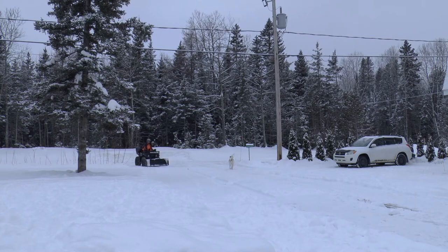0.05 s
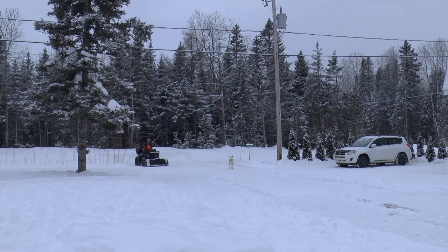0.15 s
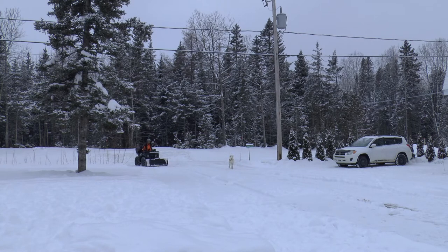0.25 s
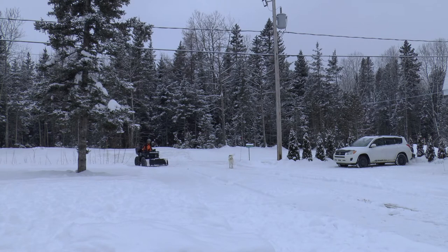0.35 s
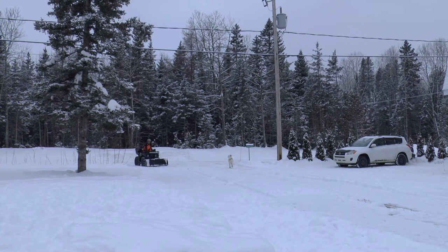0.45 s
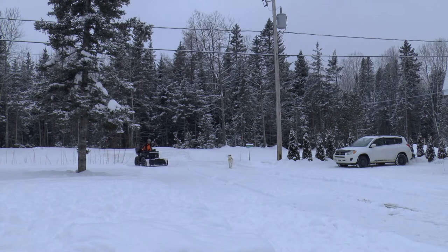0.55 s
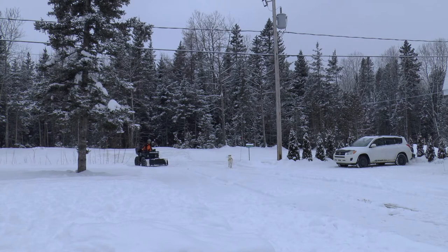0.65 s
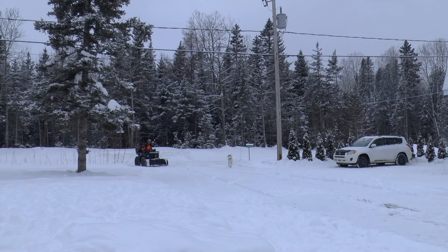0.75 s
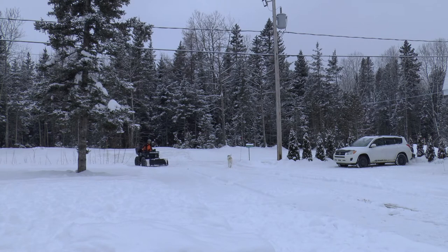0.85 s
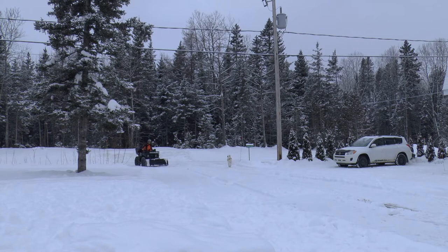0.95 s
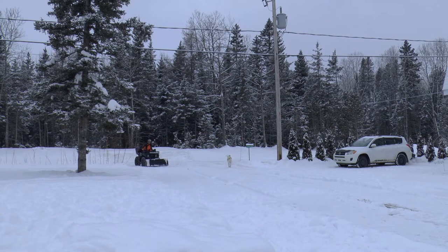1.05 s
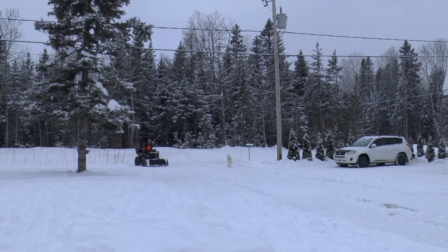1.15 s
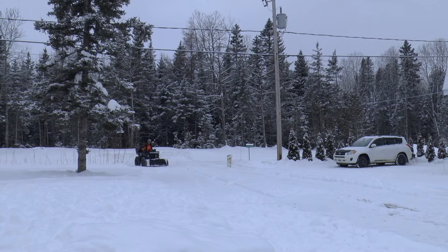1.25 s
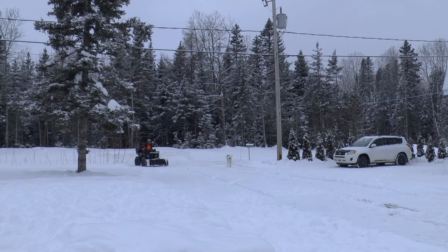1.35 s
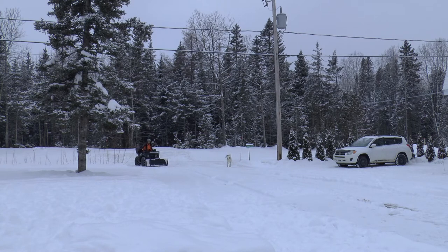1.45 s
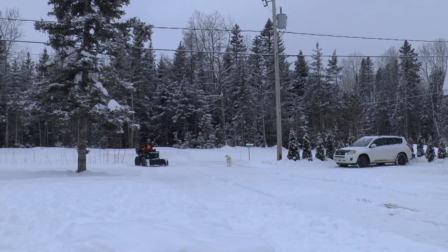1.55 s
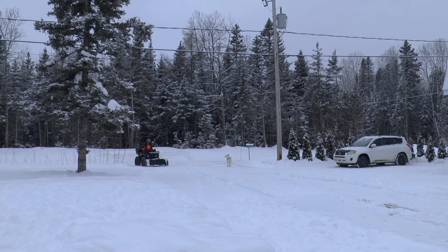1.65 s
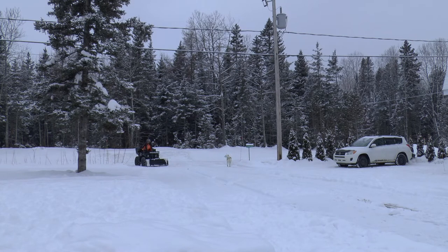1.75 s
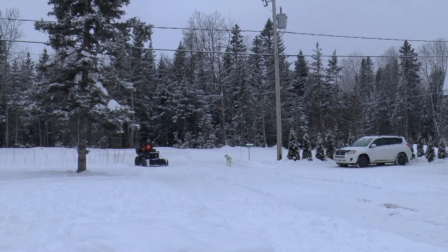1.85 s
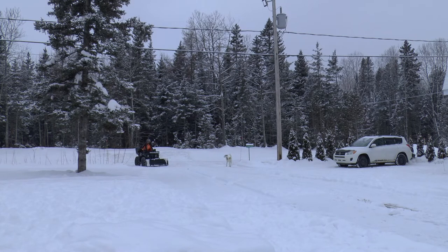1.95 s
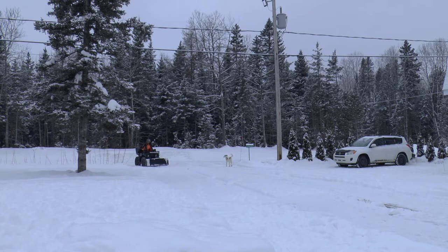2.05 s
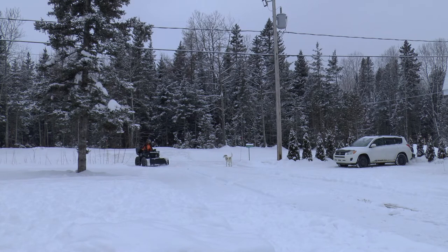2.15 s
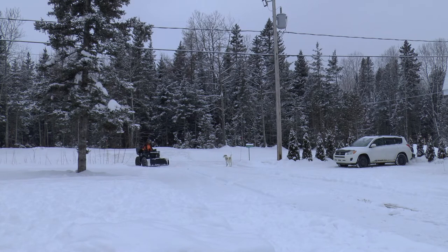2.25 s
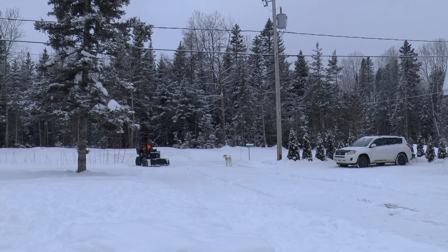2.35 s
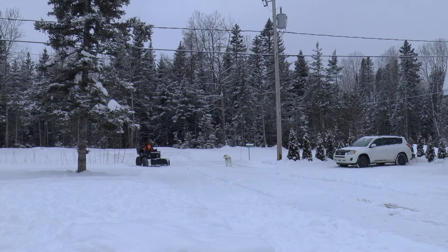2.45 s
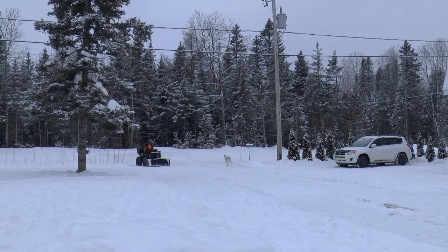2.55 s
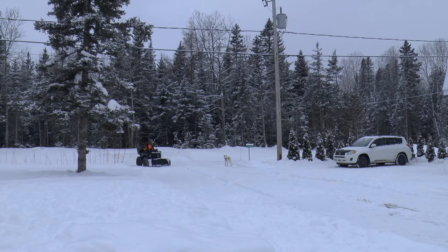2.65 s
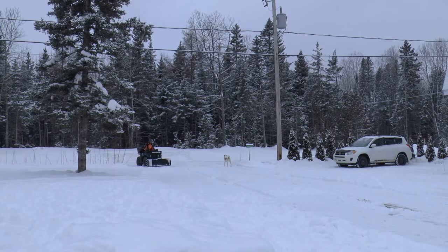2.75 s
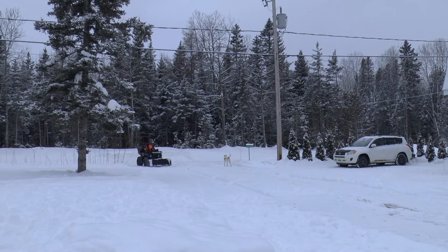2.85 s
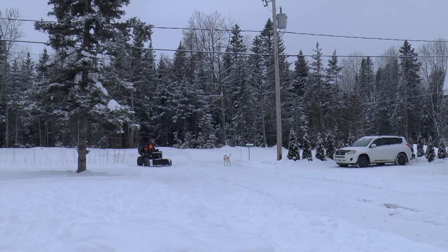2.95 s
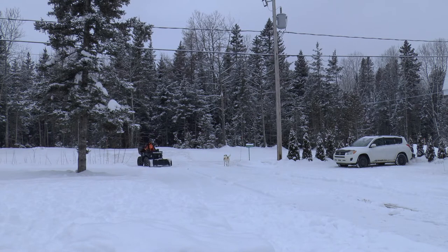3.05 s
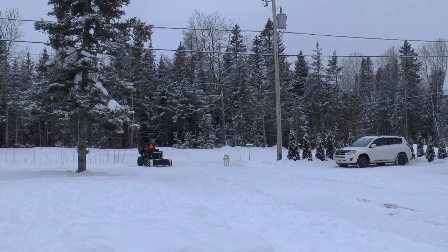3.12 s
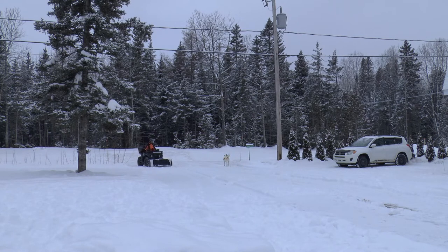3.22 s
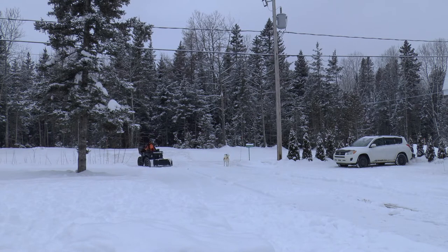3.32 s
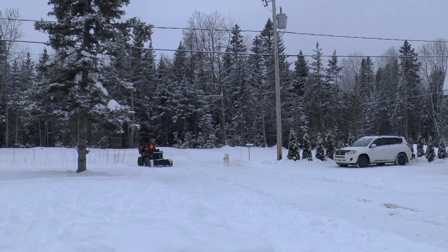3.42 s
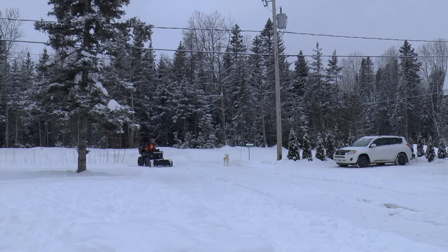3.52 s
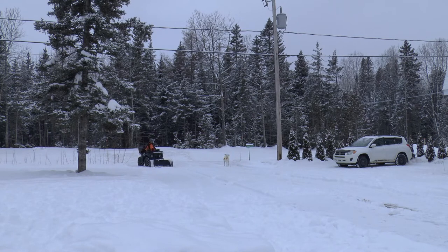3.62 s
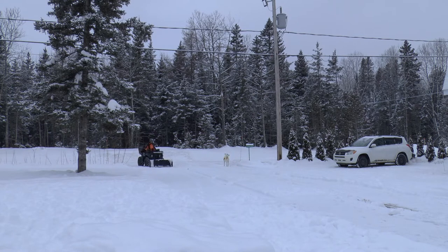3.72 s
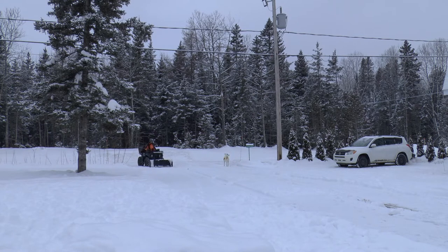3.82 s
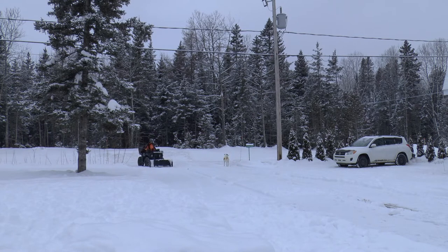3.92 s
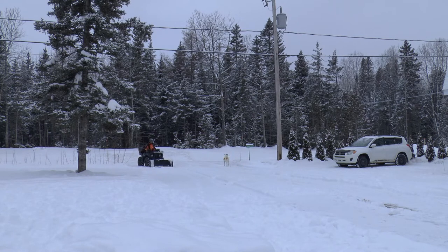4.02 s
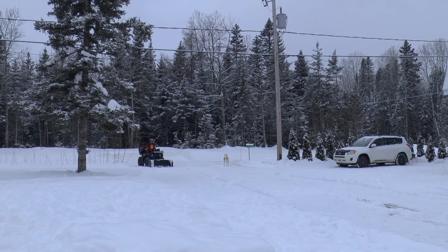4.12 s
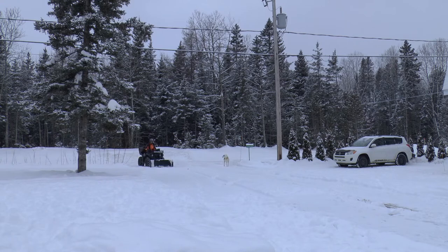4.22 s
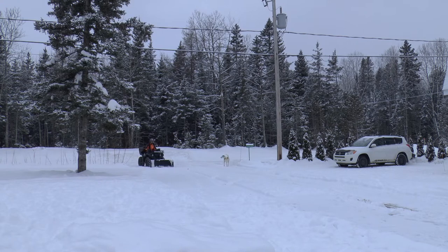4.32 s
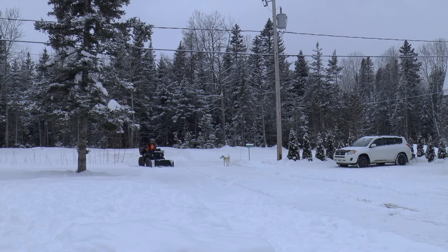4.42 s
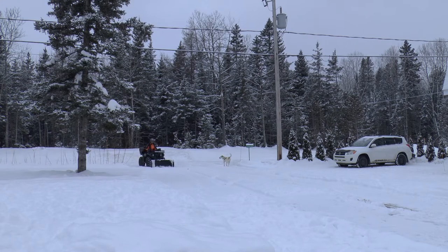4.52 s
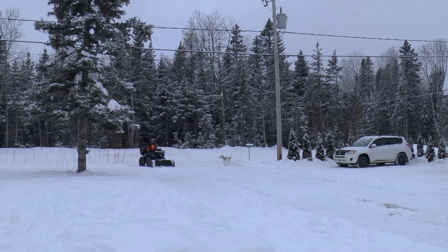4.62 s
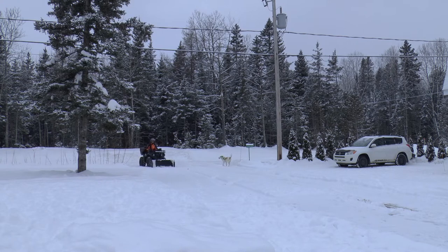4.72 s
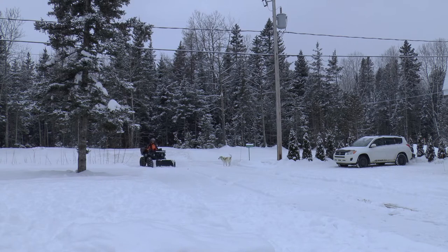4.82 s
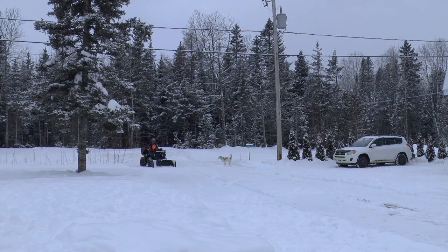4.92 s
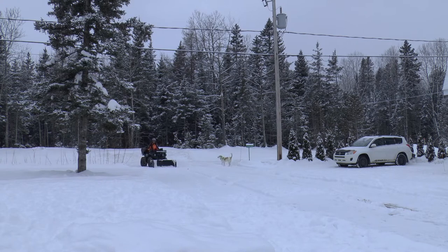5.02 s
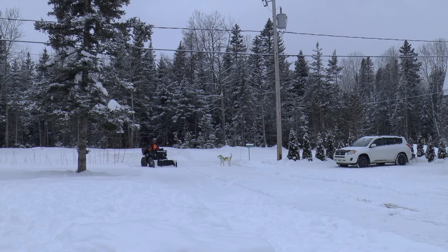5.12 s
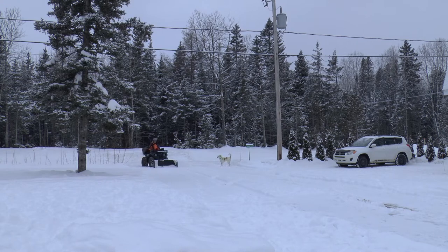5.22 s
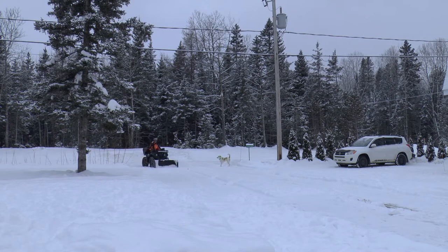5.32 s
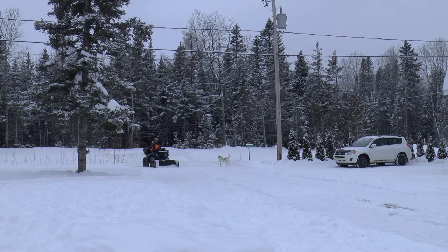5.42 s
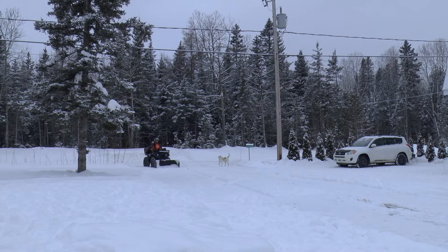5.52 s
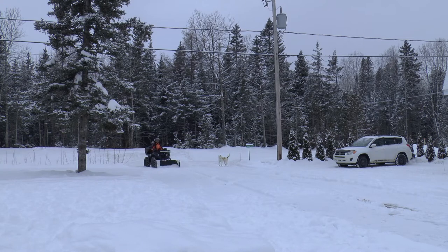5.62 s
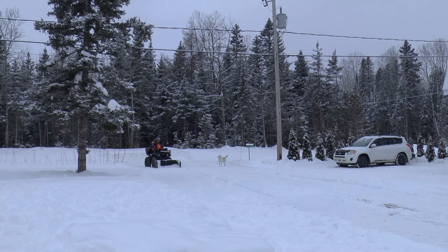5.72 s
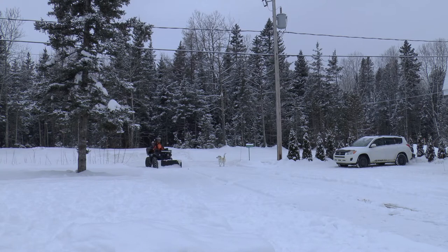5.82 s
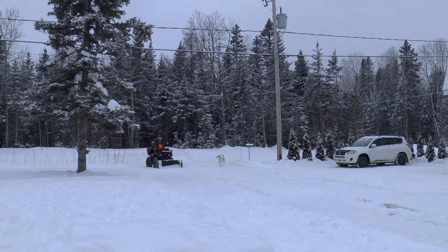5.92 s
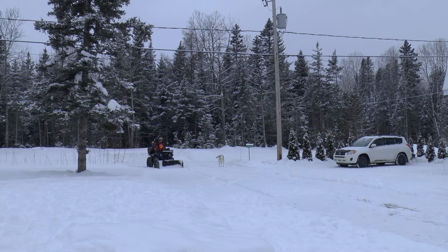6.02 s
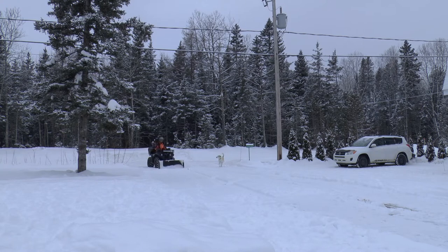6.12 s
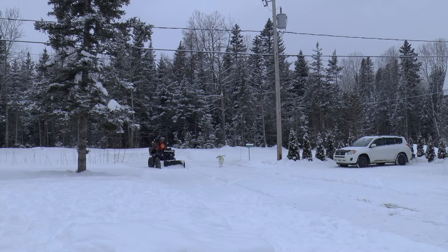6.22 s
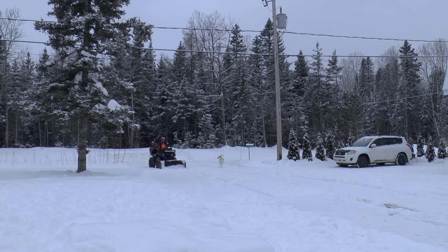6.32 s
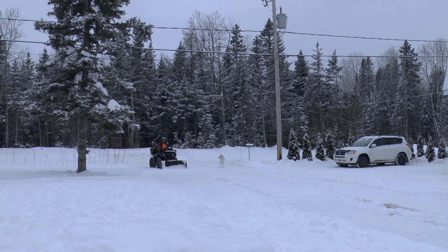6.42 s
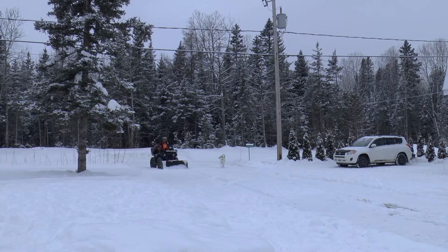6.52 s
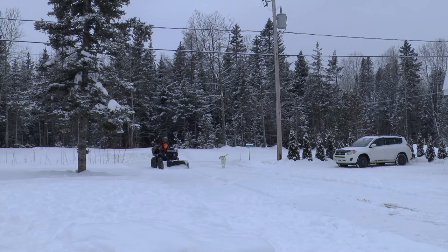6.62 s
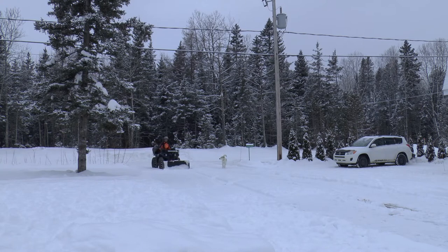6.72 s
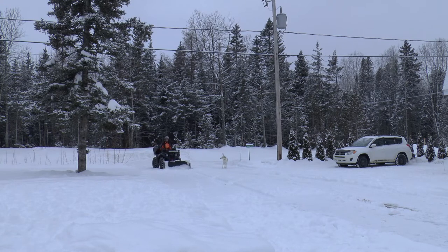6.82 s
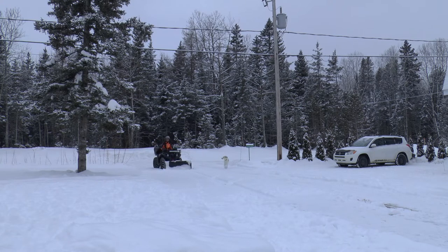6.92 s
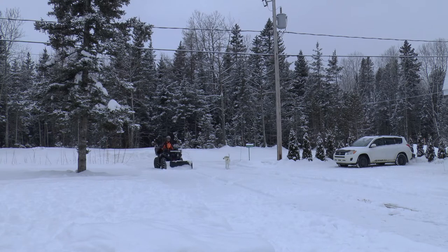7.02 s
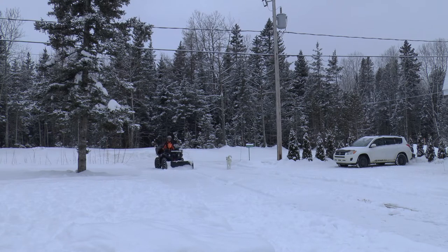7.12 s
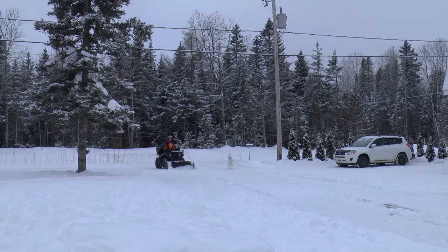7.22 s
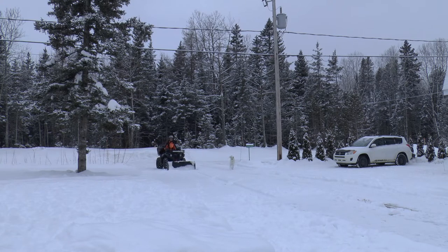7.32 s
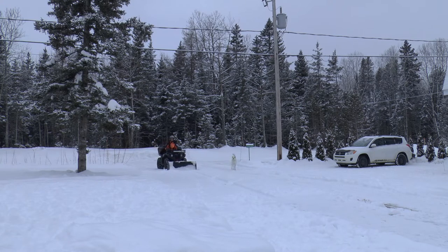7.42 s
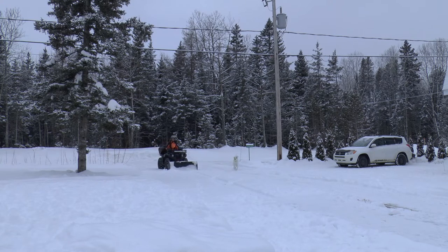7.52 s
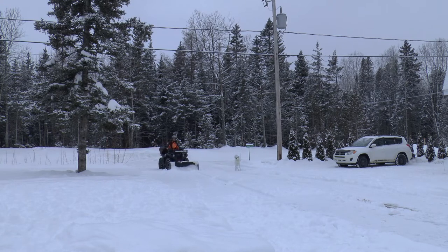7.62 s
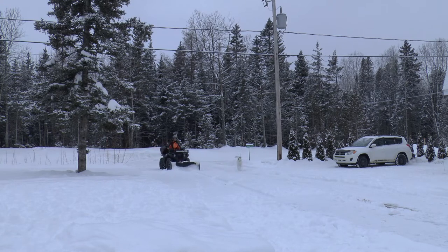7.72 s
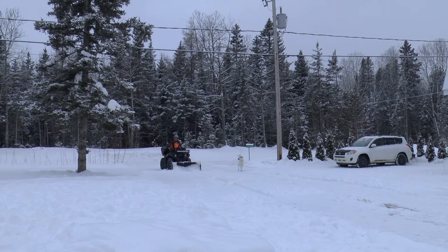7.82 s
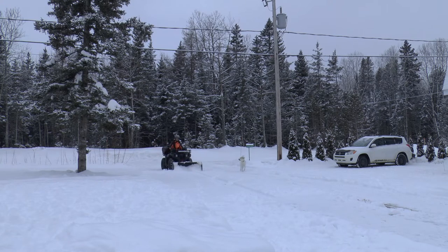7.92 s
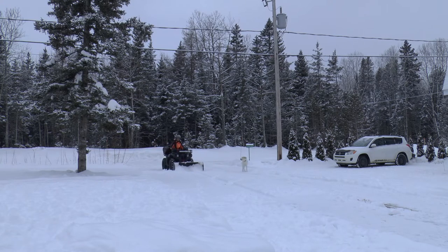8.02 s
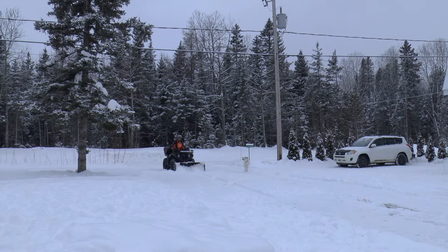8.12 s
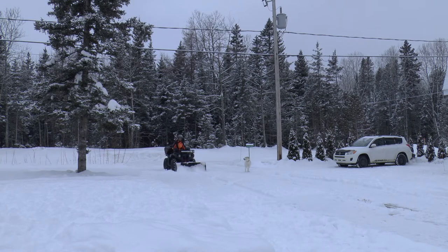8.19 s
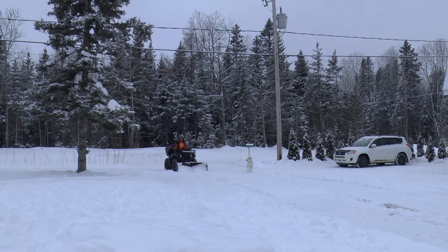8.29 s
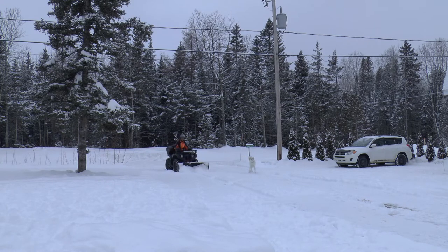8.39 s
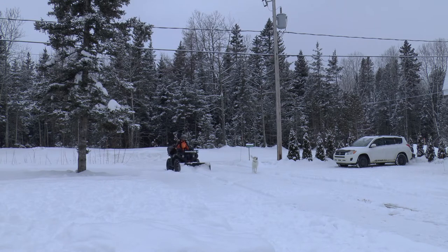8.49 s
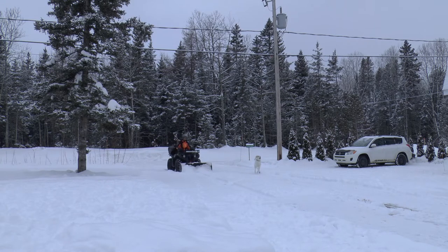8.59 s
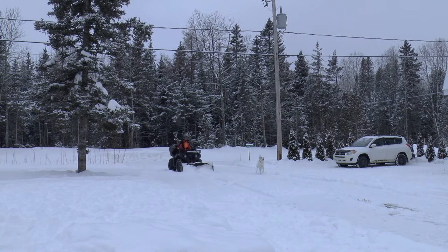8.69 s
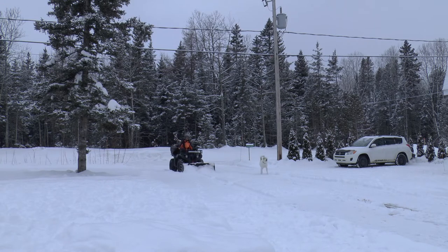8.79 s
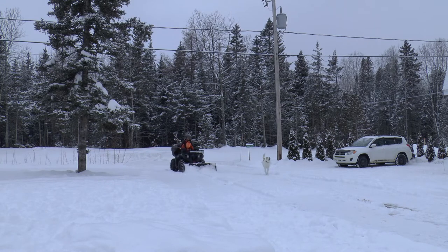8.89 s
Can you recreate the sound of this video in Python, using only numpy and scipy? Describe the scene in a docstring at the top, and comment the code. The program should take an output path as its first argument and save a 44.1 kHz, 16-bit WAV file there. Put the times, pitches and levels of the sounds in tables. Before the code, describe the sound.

An all-terrain vehicle idles with metal clacks, raises its plow with a whining winch, then revs up and slowly comes closer.

```python
"""A single-cylinder all-terrain vehicle with a snow plow works some way off in a snowy yard edged by trees.
Each firing excites the cavity resonances of airbox and exhaust, a boom, while valve impacts ring the
casing. It idles and shunts as gear lever and plow mount clack; a winch clicks in and raises the blade
with a whine of meshing gears. Under load the engine picks up and comes closer, growing louder.
Two walls reflect the sound and the trees scatter it, over a faint steady hiss."""
import sys
import numpy as np
from scipy import signal
from scipy.fft import rfft, irfft
from scipy.io import wavfile
from scipy.ndimage import uniform_filter1d

SR = 44100
rng = np.random.default_rng(int(sys.argv[2]) if len(sys.argv) > 2 else 0)


def waveform_to_disk(signal):
    """Save audio, clipped to [-1, 1], as 16-bit WAV at the path in sys.argv[1]."""
    frames = np.transpose(np.atleast_2d(signal))
    scaled = np.clip(frames, -1, 1) * 32767
    samples = np.round(scaled).astype(np.int16)
    wavfile.write(sys.argv[1], SR, samples)


N = 394694
TIME = np.arange(N) / SR

# engine speed: (time [s], firing rate [Hz])
FIRING = [(0.0, 11.8), (1.45, 11.61), (1.73, 17.92), (1.97, 20.69), (2.53, 19.94), (2.73, 19.64),
          (3.04, 13.19), (3.53, 10.41), (3.93, 19.44), (4.2, 21.47), (4.82, 22.57), (5.42, 22.37),
          (6.13, 26.64), (7.26, 29.31), (7.6, 29.97), (8.07, 29.61), (8.95, 28.59)]
# spectrum of a sharp metal snap: (frequency [Hz], level [dB])
SNAP = [(300, -22), (700, -22), (1400, -15.5), (1800, -7), (3200, -3), (6000, -10.5), (9000, -16.5),
        (16000, -42)]

IDLE_HZ, FULL_HZ = 11.8, 30  # firing rates
DRIVE_S = 2.65  # the machine drives off
THROTTLE_DB = 0.0812  # lift of boom and clatter per Hz/s of engine acceleration


def boom(cycles, lead_s=0.02092):
    """Cavity resonance: firing pulses drive airbox, muffler and pipe; hotter gas raises the muffler note."""
    # spectrum of a firing pulse: (frequency [Hz], level [dB])
    pulse_spectrum = [(15, 12), (29, -10.5), (44, -3), (60, -12), (80, 12), (105, 11.5), (132, 3.5),
                      (165, -9.5), (240, -40), (400, -31)]
    # swell as harmonics cross the resonances: (firing rate [Hz], airbox level [dB], muffler level [dB])
    cavity_levels = [(11.6, -48, -50.5), (16.2, -43.5, -47.5), (18.2, -48, -41), (20.65, -55, -44),
                     (22.4, -45, -38.5), (24.7, -40, -39.5), (25.5, -46, -43.5), (27, -42, -40),
                     (30.2, -39, -36.5)]
    speed = curve(FIRING)
    thump = colour(strokes(cycles + lead_s * speed, spread_db=1), pulse_spectrum)
    speeds, *levels = np.transpose(cavity_levels)
    airbox_db, muffler_db = (np.interp(speed, speeds, db) + THROTTLE_DB * throttle() for db in levels)
    muffler_hz = np.interp(speed, [12, 21, 30], [100, 112, 117])
    pipe_db = -54 + 0.15 * (muffler_db - muffler_db.max())
    # (frequency [Hz], bandwidth [Hz], level [dB])
    cavities = [(84, 30, airbox_db), (muffler_hz, 34, muffler_db), (46, 18, pipe_db), (178, 35, -63.5)]
    return sum(amp(db) * steadied(resonate(resonate(thump, hz, width), hz, width))
               for hz, width, db in cavities)


def clatter(cycles, t60=0.083, looseness=0.54, gas_rush=0.93):
    """Impact excitation: valve and piston ticks ring the casing; loose play and gas rush add noise."""
    # valve and piston impacts: (phase [cycles], level [dB])
    impacts = [(0.01, -0.5), (0.17, -3), (0.44, -1), (0.54, -1.5), (0.7, -4.5)]
    # spectra of the gruff midrange and the bright metal: (frequency [Hz], level [dB])
    gruff_spectrum = [(70, -23), (170, 5), (300, 2), (450, -2.5), (750, -6), (900, -6.5), (1250, 0),
                      (1700, -13), (4000, -34.5)]
    metal_spectrum = [(700, -26), (1300, -21), (1800, 2), (2500, 1.5), (3100, -3.5), (4400, -8.5),
                      (5800, -20), (8000, -22.5), (10000, -24), (13000, -33), (16000, -64.5)]
    # casing resonances: (frequency [Hz], bandwidth [Hz], gain [dB])
    casing_modes = [(579, 21, 7), (741, 160, 11.5), (1070, 86, 5.5), (1426, 180, 11), (1760, 63, 3),
                    (2370, 31, 4.5), (2304, 68, -6.5), (2760, 38, -3.5), (3430, 130, -2.5)]
    ticks, play = np.zeros(N), np.zeros(N)
    for phase, db in impacts:
        hits = amp(db) * strokes(cycles - phase, spread_db=2)
        ticks += signal.oaconvolve(hits, ring(t60))[:N]
        play += signal.oaconvolve(hits, amp(-60 * TIME[:SR // 10] / t60))[:N]
    force = evened(ticks) + (looseness * evened(play) + gas_rush) * rng.standard_normal(N)
    octaves = np.log2(curve(FIRING) / IDLE_HZ)
    opening = np.maximum(throttle(), 0)
    gruff = colour(force, gruff_spectrum, casing_modes)
    gruff_db = -66 + 7 * octaves + 3 * load() + 0.06 * opening
    metal = colour(force, metal_spectrum, casing_modes)
    # at low speed the casing's lower modes chug once a cycle; with speed the chugs run together
    chug_db = np.interp(curve(FIRING), [17, 26], [1, 0]) + 0.34 * opening
    chug = amp(chug_db * np.cos(2 * np.pi * (cycles - .65)))
    metal += (chug - 1) * resonate(metal, hz=1750, width=360)
    metal_db = -59 + 8 * octaves + THROTTLE_DB * throttle()
    return amp(gruff_db) * steadied(gruff) + amp(metal_db) * steadied(metal)


def knock(cycles, phase=.905, t60=0.03, full_speed_db=-49.5, fall_db_per_hz=2.5):
    """Impulse response: combustion raps the cylinder once a cycle, nearly the same way each time."""
    # cylinder response: (frequency [Hz], level [dB])
    spectrum = [(900, -51), (2000, -3.5), (2700, 2.0), (3700, -3), (5500, -37), (12000, -62)]
    hits = strokes(cycles - phase, spread_db=0.8)
    play = signal.oaconvolve(hits, amp(-60 * TIME[:SR // 10] / t60))[:N] * rng.standard_normal(N)
    blows = signal.oaconvolve(hits, ring(t60))[:N] + play
    rap = colour(blows, spectrum, modes=[(2287, 36, 9)])
    return amp(full_speed_db - fall_db_per_hz * (FULL_HZ - curve(FIRING))) * steadied(rap)


def overtones(cycles, waver_db=3.0):
    """Harmonics of a periodic source: under load a few high engine orders stand out, growing with speed."""
    # engine orders: (frequency [multiples of the firing rate])
    orders = [16, 20, 26]
    # strength of each order: (level [dB])
    levels = [-73.5, -68.5, -70.5]
    tones = sum(amp(db + waver_db * wander(6)) * np.sin(2 * np.pi * order * cycles)
                for order, db in zip(orders, levels))
    return load() * (curve(FIRING) / FULL_HZ) ** 4 * tones


def throttle():
    """Engine acceleration: the smoothed slope of the firing rate, in Hz/s."""
    return uniform_filter1d(np.gradient(curve(FIRING)) * SR, size=6000)


def load(rise_s=2):
    """Engine load, 0-1: a linear ramp as the machine drives off."""
    return np.clip((TIME - DRIVE_S) / rise_s, 0, 1)


def winch(on_s=3.335, off_s=5.395, rise_s=0.14, fall_s=0.035, squeak_s=5.278, level_db=-44.5):
    """Amplitude modulation: planet gears grind and whine, pulsing as motor and carrier turn."""
    # tooth meshing: (time [s], frequency [Hz])
    mesh = [(3.38, 2890), (3.7, 2920), (4.3, 2883), (4.9, 2898), (5.44, 2813)]
    # spectrum of the grinding: (frequency [Hz], level [dB])
    gear_spectrum = [(400, -35), (1400, -6.5), (2000, 2), (3000, 6.5), (4300, 5.5), (5500, -3.5),
                     (6200, -6.5), (7200, -12), (9500, -16.5), (12500, -29), (16000, -40)]
    # housing resonances: (frequency [Hz], bandwidth [Hz], gain [dB])
    housing_modes = [(2034, 89, 9.7), (2370, 41, 0.69), (3520, 31, 3.6), (3700, 29, 1.3), (5090, 110, 3.7),
                     (6050, 60, 6.9)]
    since_on, since_off = np.maximum(TIME - on_s, 0), np.maximum(TIME - off_s, 0)
    running = (1 - np.exp(-since_on / rise_s)) * np.exp(-since_off / fall_s)
    mesh_cycles = np.cumsum(curve(mesh)) / SR
    motor, carrier = (np.cos(2 * np.pi * mesh_cycles / teeth_per_turn) for teeth_per_turn in (39.7, 68))
    friction = rng.standard_normal(N) * amp(2 * (wander(93) + motor))
    grind = evened(colour(friction, gear_spectrum, housing_modes))
    slip = np.cumsum(curve(mesh) * .0125 * wander(160)) / SR
    whine = evened(np.sin(2 * np.pi * (mesh_cycles + slip)) * (1 + .4 * motor + .9 * carrier))
    whine *= amp(-7 + 2 * wander(35))
    # the gears squeak once as the blade nears the top
    squeak = amp(9) * np.exp(-((TIME - squeak_s) / 0.0055) ** 2) * np.sin(2 * np.pi * mesh_cycles)
    # the winch motor hums, swelling in as the blade rises
    hum_swell = np.interp(TIME, [3.9, 4.6], [0, 1])
    hum = amp(-21) * hum_swell * evened(resonate(rng.standard_normal(N), hz=247.2, width=8))
    return running * amp(level_db) * (grind + whine + squeak + hum)


def clacks(rebound_s=0.02, rise_s=0.0019, t60=0.089):
    """Inelastic collision: steel parts strike, rebound and chatter; hard blows add a short bright crack."""
    # blows of lever and plow mount: (time [s], level [dB], relative rebound [dB], hardness [dB])
    blows = [(0.096, -39.5, -2, -6), (0.1635, -41, -18, -8), (0.192, -38, -18, 8), (0.503, -40, -27, -14),
             (0.559, -47, -20, -12), (0.872, -49.5, -24, 0), (0.996, -38, -4.5, -12), (1.083, -40, 1.5, -6),
             (1.9858, -41, -2.5, 25), (2.1354, -45, -20, 0), (2.4057, -37, -2.5, 5),
             (2.5106, -42.5, -25, -7), (2.766, -38.5, -42, -4), (2.935, -36.5, -2, 15),
             (2.965, -37.5, -17, 17), (3.016, -44, 5, 28), (3.158, -36, -30, 0), (3.1927, -32, -5, 7)]
    # spectrum of the mount: (frequency [Hz], level [dB])
    spectrum = [(300, -3.5), (1500, -12), (2300, 5), (3100, 1), (4300, 4.5), (5600, -10.5), (9000, -20),
                (12000, -27), (16000, -41)]
    # its resonances: (frequency [Hz], bandwidth [Hz], gain [dB])
    modes = [(1965, 80, 10), (2240, 53, 1.8), (2630, 570, 7.2), (3040, 78, 15.4), (3694, 125, 10.8),
             (4110, 17, 2.7), (8030, 190, 10)]
    body, bright = np.zeros(N), np.zeros(N)
    for strike_s, strike_db, rebound_db, hard_db in blows:
        for when, db in ((strike_s, strike_db), (strike_s + rebound_s, strike_db + rebound_db)):
            start = round(when * SR)
            age = TIME[:min(SR // 3, N - start)]
            fade = amp(-60 * age / t60) * (1 - np.exp(-age / rise_s))
            body[start:start + len(age)] += amp(db) * fade
            bright[start:start + len(age)] += amp(db + hard_db) * fade ** 2
    chatter = rng.standard_normal(N) * amp(0.5 * wander(510))
    ringing = colour(chatter * body, spectrum, modes) / np.std(colour(chatter, spectrum, modes))
    crack = bright * evened(colour(chatter, SNAP))
    return amp(-1) * ringing + amp(-27) * crack


def contactor(t60=0.036):
    """Broadband transients: the winch's contactor snaps shut, bounces and later drops out."""
    # contact impacts: (time [s], level [dB])
    impacts = [(3.3688, -31.5), (3.375, -31), (3.396, -44), (5.394, -41)]
    envelope = sum((TIME >= when) * amp(db - 60 * abs(TIME - when) / t60) for when, db in impacts)
    return envelope * evened(colour(rng.standard_normal(N), SNAP))


def gear_thump(engage_s=3.014, hz=118, level_db=-35, t60=0.34):
    """Damped oscillation: the drive line takes up its slack with one dull thump as the gear goes in."""
    age = np.maximum(TIME - engage_s, 0)
    return amp(level_db - 60 * age / t60) * np.sin(2 * np.pi * hz * age)


def approach(start_m=21.4, speed_m_per_s=1.63):
    """Spherical spreading: pressure grows as 1 / distance while the machine drives nearer."""
    return start_m / (start_m - speed_m_per_s * np.maximum(TIME - DRIVE_S, 0))


def yard(x, wall_delays_s=(.00908, .0253), scatter_db=-13, t60=0.16):
    """Reflection and scattering: two walls return all but the bass; trees give each ear its own tail."""
    # response of the trees: (frequency [Hz], gain [dB])
    tree_spectrum = [(60, -18), (250, -9), (1000, 4), (2200, 0), (4500, -5), (8000, -83), (12000, -26)]
    age = TIME[:SR // 2]
    scatter = rng.standard_normal((2, len(age))) * amp(-60 * age / t60)
    scatter *= amp(scatter_db) / np.linalg.norm(scatter, axis=1, keepdims=True)
    tail = signal.oaconvolve(colour(x, tree_spectrum)[None], scatter, axes=1)[:, :N]
    reflected = signal.sosfilt(signal.butter(2, 260, "high", fs=SR, output="sos"), x)
    near, far = (np.pad(reflected, (round(delay * SR), 0))[:N] for delay in wall_delays_s)
    return x + amp(-11) * near + amp(-19) * far + tail


def air(level_db=-62.5):
    """Uncorrelated noise: a faint low rush and high hiss, independent at each ear."""
    # background spectrum: (frequency [Hz], level [dB])
    spectrum = [(20, 21.5), (100, 32.5), (200, 30), (400, 23.5), (1000, -5), (6000, -38), (9000, 2),
                (16000, 5)]
    return amp(level_db) * np.array([evened(colour(rng.standard_normal(N), spectrum)) for _ in range(2)])


def strokes(cycles, spread_db):
    """Impulse train: one impulse a cycle, each of slightly different strength."""
    at = np.flatnonzero(np.diff(np.floor(cycles), prepend=-1) > 0)
    impulses = np.zeros(N)
    impulses[at] = amp(spread_db * rng.standard_normal(len(at)))
    return impulses


def ring(t60, size=4096):
    """Modal overlap: dense metal modes act as a burst of decaying noise."""
    return rng.standard_normal(size) * amp(-60 * TIME[:size] / t60)


def resonate(x, hz, width):
    """Resonance of unit gain, its centre hz fixed or gliding."""
    phasor = np.exp(2j * np.pi * np.cumsum(hz * np.ones(N)) / SR)
    pole = np.exp(-np.pi * width / SR)
    return 2 * (phasor * signal.lfilter([1 - pole], [1, -pole], x / phasor + 1e-18)).real


def colour(x, spectrum, modes=(), size=16384):
    """Minimum-phase filter: a broad spectrum with resonance peaks and dips on it."""
    hz = np.fft.rfftfreq(size, 1 / SR)
    points, db = np.transpose(spectrum)
    db = np.interp(np.log(hz + 1), np.log(points), db)
    for centre, width, lift in modes:
        db = db + lift / (1 + (2 * (hz - centre) / width) ** 2)
    cepstrum = irfft(np.log(amp(db)))[:size // 2]
    cepstrum[1:] *= 2
    response = irfft(np.exp(rfft(cepstrum, size)))[:size // 2]
    return signal.oaconvolve(x, response)[:N]


def wander(rate_hz):
    """Random fluctuation: low-passed noise of rms 1."""
    hz = np.fft.rfftfreq(N, 1 / SR)
    return evened(irfft(rfft(rng.standard_normal(N)) / (1 + (hz / rate_hz) ** 4), N))


def curve(rows):
    """Linear interpolation of (time, value) rows at every sample."""
    return np.interp(TIME, *np.transpose(rows))


def steadied(x):
    """Running normalisation: holds the rms at 1 over spans of several firings."""
    power = uniform_filter1d(uniform_filter1d(x ** 2, size=7500), size=7500)
    return x / np.sqrt(abs(power) + 1e-20)


def evened(x):
    """Normalisation to rms 1."""
    return x / np.sqrt(np.mean(x ** 2) + 1e-20)


def amp(db):
    """Decibels to amplitude ratio."""
    return 10 ** (np.asarray(db) / 20)


def scene():
    """Superposition: the machine's sources add, approach through the yard and join the background."""
    cycles = np.cumsum(curve(FIRING)) / SR - .08
    engine = boom(cycles) + clatter(cycles) + knock(cycles) + overtones(cycles)
    machine = engine + winch() + clacks() + contactor() + gear_thump()
    balance = amp([[.15], [-.15]])
    return yard(machine * approach()) * balance + air()


def record(dry, cutoff_hz=15750):
    """Band limiting: a steep low-pass removes the highest treble."""
    lowpass = signal.firwin(511, cutoff_hz, window=("kaiser", 9), fs=SR)
    return signal.oaconvolve(dry, lowpass[None], "same")


dry = scene()
out = record(dry)
waveform_to_disk(out)
```